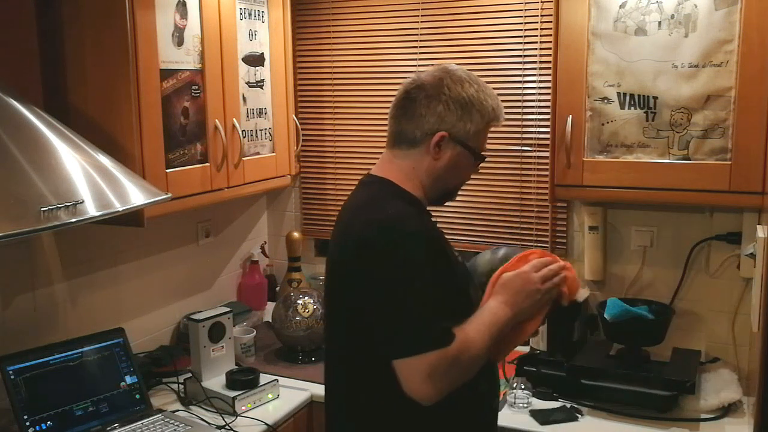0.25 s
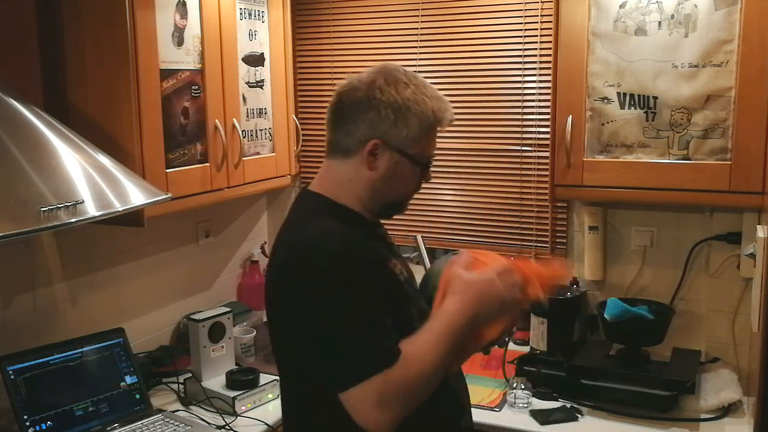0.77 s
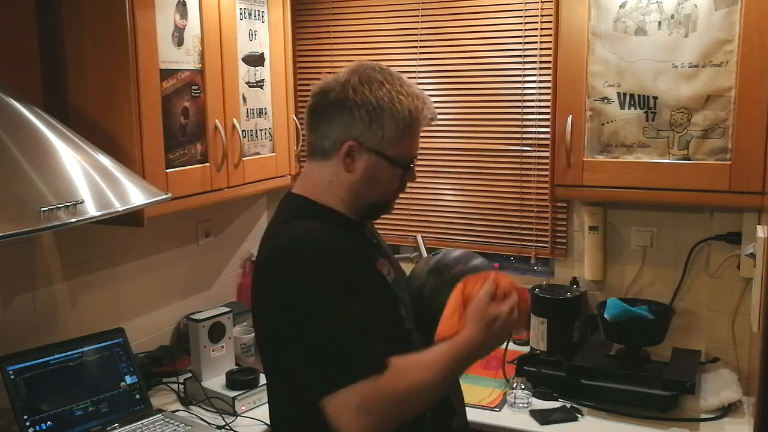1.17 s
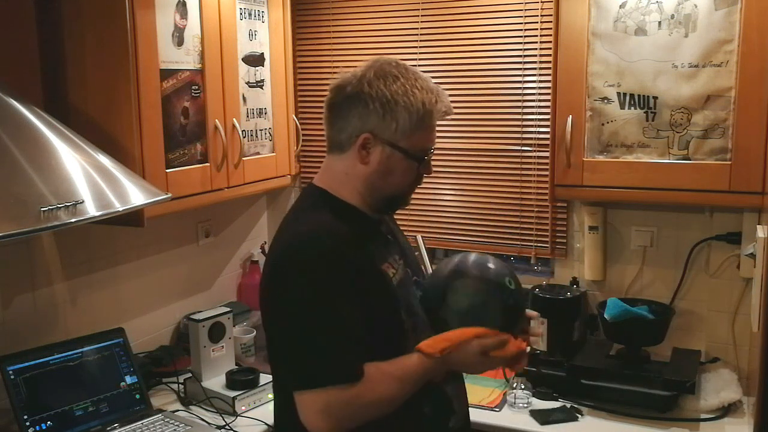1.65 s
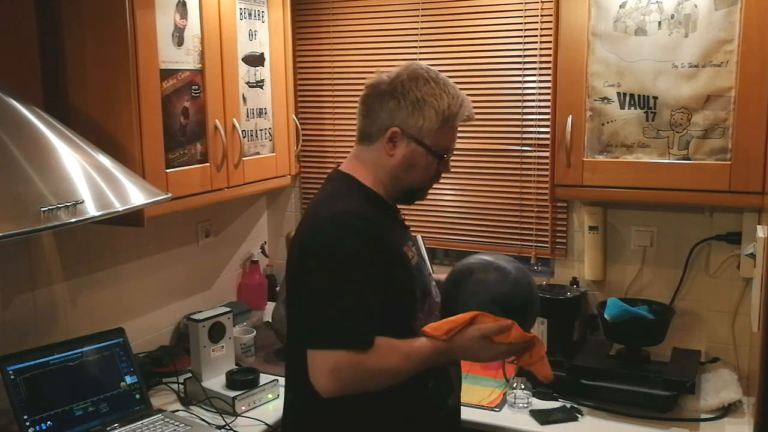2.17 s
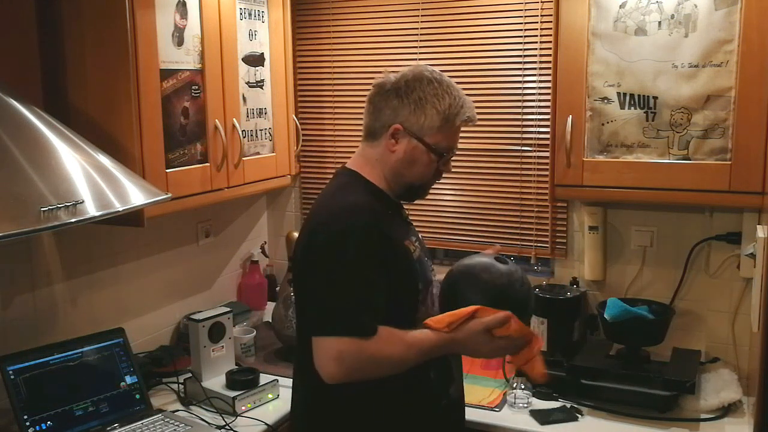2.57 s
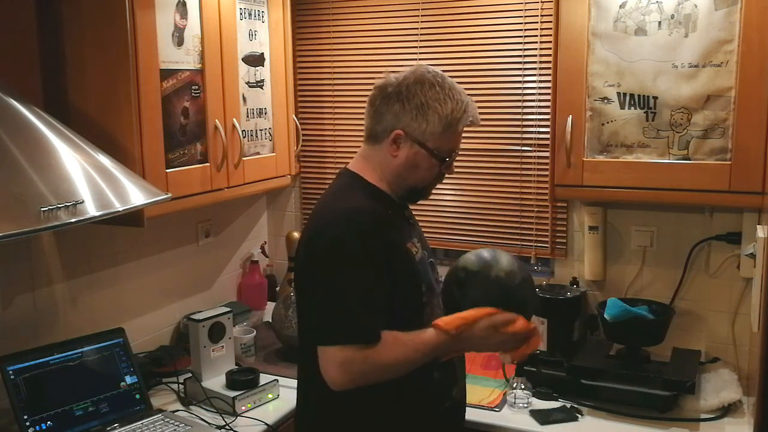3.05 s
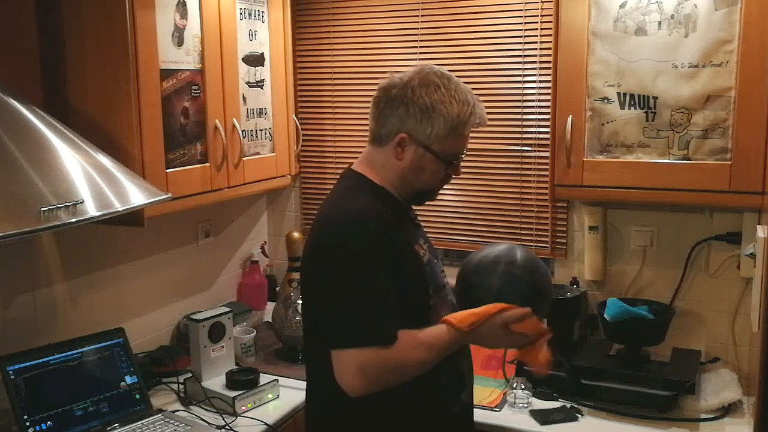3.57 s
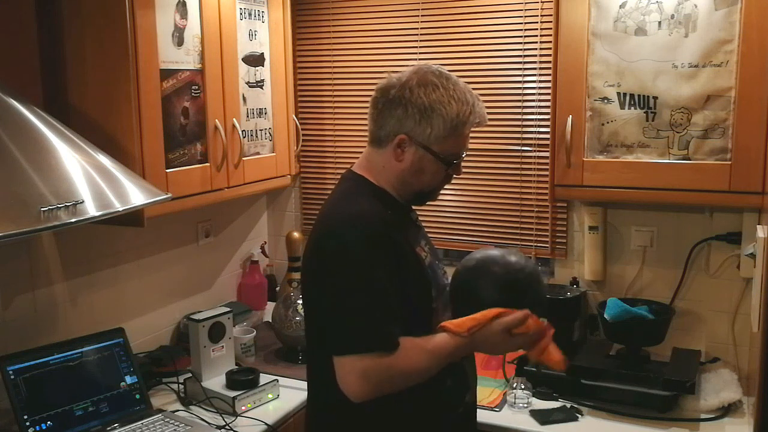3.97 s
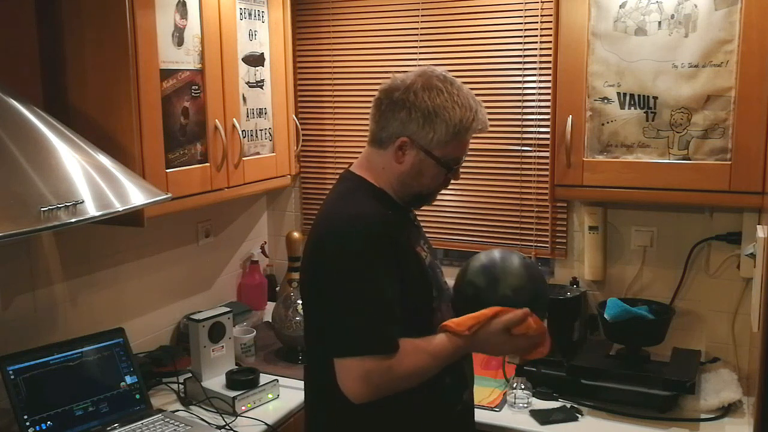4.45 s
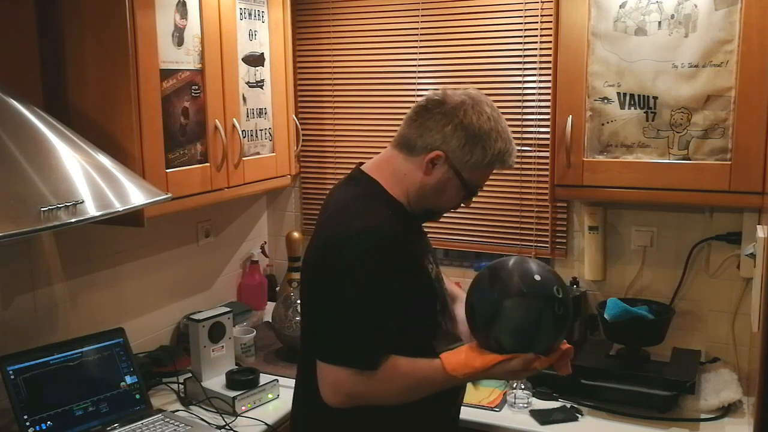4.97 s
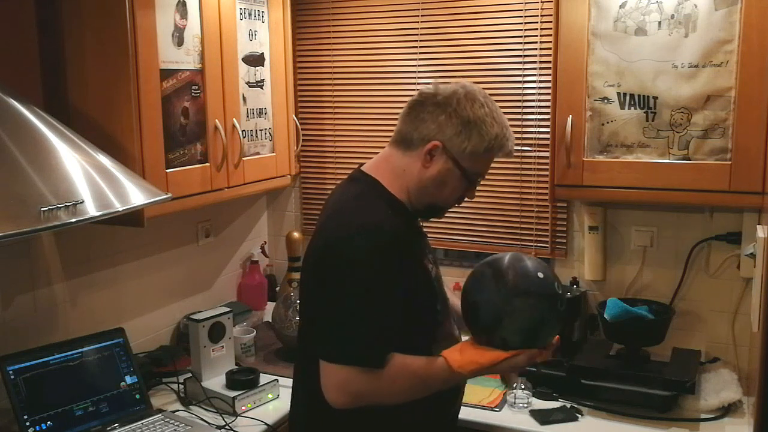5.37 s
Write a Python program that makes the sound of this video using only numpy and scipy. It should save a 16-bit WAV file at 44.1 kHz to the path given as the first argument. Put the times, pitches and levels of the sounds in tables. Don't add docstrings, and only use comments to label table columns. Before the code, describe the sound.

Soft cloth strokes hiss over a hard heavy ball, with small clicks and dull thuds, then two juddering knocks near the end.

```python
import sys
import numpy as np
from scipy import signal
from scipy.fft import rfft, irfft
from scipy.io import wavfile
from scipy.ndimage import uniform_filter1d

SR = 44100
rng = np.random.default_rng(int(sys.argv[2]) if len(sys.argv) > 2 else 0)


def boost_factor(decibels):
    exponent = np.asarray(decibels, float) / 20
    return 10 ** exponent


def put_to_file(sound):
    columns = np.atleast_2d(sound).T
    safe = np.clip(columns, -1, 1)
    whole_steps = np.round(safe * 32767)
    wavfile.write(sys.argv[1], SR, whole_steps.astype(np.int16))


N = 246827
STEP = 32

# heaviest moment in seconds, building in seconds,
# easing in seconds, rumble in dB, scrub in dB.
CATCHES = [
    (5.05, 0.088, 0.14, -41.5, -53),
    (5.37, 0.068, 0.09, -47, -53),
]


def evened(x):
    return x / np.sqrt(np.mean(x ** 2) + 1e-20)


def read(points, hz):
    f, value = np.transpose(points)
    return np.interp(np.log(hz + 1), np.log(f + 1), value)


def add(mix, s, sound):
    part = mix[round(s * SR):][:len(sound)]
    part += sound[:len(part)]


def arch(s, rise, fall):
    t = np.arange(0, N, STEP) / SR - s
    progress = np.where(t < 0, -t / rise, t / fall)
    return np.cos(np.pi / 2 * np.clip(progress, 0, 1)).clip(0)


def course(points):
    return np.interp(np.arange(0, N, STEP) / SR, *np.transpose(points))


def fine(x):
    return np.interp(np.arange(N), np.arange(0, N, STEP), x)


def noise(spectrum, size, patchy_db=0.):
    hz = np.fft.rfftfreq(size, 1 / SR)
    a, b, patches = rng.standard_normal((4 * N // size + 5, len(hz), 3)).T
    patches = uniform_filter1d(patches, size=7, axis=0)
    patches = evened(uniform_filter1d(patches, size=19, axis=1))
    z = (a + 1j * b) * boost_factor(read(spectrum, hz)[:, None] + patchy_db * patches)
    return evened(signal.istft(z, nperseg=size, noverlap=3 * size // 4)[1][:N])


def whistle(hz, width, steady=0.):
    r = np.exp(-np.pi * width / SR)
    slow = rng.standard_normal((len(hz) + 2000, 2)) @ [1, 1j]
    for _ in range(2):
        slow = signal.lfilter([1 - r], [1, -r], slow)
    slow = steady + slow[2000:] / abs(slow).mean()
    waver = evened(uniform_filter1d(rng.standard_normal(len(hz)), size=500))
    phase = 2 * np.pi * np.cumsum(hz * (1 + .003 * waver)) / SR
    return evened((slow * np.exp(1j * phase)).real)


def cloth():
    # frequency in Hz, level in dB per Hz.
    hiss_spectrum = [(880, -18.5), (1900, -13), (2490, -7.5), (3410, -1), (3840, -1), (4900, -2.5),
                     (6400, -1.5), (7980, -6), (9310, -11.5), (13000, -24)]
    fizz_spectrum = [(5000, -44), (8000, 1.5), (10000, 2), (12500, -1.5), (15000, -9), (16500, -13)]
    slip_spectrum = [(900, -24), (2000, -19), (3000, -8.5), (4000, -1.5), (5000, -0.5), (6500, -4),
                     (9000, -8), (13000, -21.5)]
    scrub_spectrum = [(88, -25), (150, -4.5), (264, 2.5), (318, -5), (384, -1), (785, -3), (1260, -9),
                      (1690, -11.5), (3000, -16), (3900, -34), (6600, -120)]
    # fastest moment in seconds, speeding up in seconds,
    # slowing down in seconds, hiss in dB, fizz in dB relative to the hiss.
    wipes = [(.3, 0.16, 0.083, -52, -10), (.49, 0.12, 0.039, -54, -12), (.57, 0.053, 0.18, -49, -17),
             (.91, 0.11, 0.11, -47, -9.5), (1.05, 0.15, 0.12, -46.5, -8.5), (1.4, .07, .06, -64, 0),
             (1.53, .14, 0.081, -49.5, -11.5), (1.88, 0.18, 0.19, -51, -7), (2.18, 0.15, 0.055, -50.5, -8),
             (2.25, 0.056, 0.086, -55.5, -8), (2.38, 0.086, 0.05, -59, -9), (2.47, 0.061, 0.11, -53.5, -11),
             (2.57, 0.12, 0.31, -56, -7.5), (2.88, 0.22, 0.11, -52, -5), (3.16, .11, 0.16, -52.5, -9),
             (3.28, 0.09, 0.08, -57.5, -8), (3.37, .09, .035, -57, -11), (3.45, 0.036, .06, -57, -9),
             (3.57, 0.15, 0.093, -52, -9.5), (3.79, 0.086, 0.043, -56.5, -10),
             (3.84, 0.035, .17, -50.5, -9.5), (4.21, .11, 0.22, -52.5, -8), (4.46, 0.076, 0.23, -54, -13),
             (4.62, 0.066, .1, -54.5, -4.5), (4.76, 0.14, 0.12, -58.5, -3),
             (5.14, 0.019, 0.081, -59.5, -12), (5.43, 0.064, 0.11, -57, -0.5)]
    slides = [
        (1.694, 0.017, 0.019, -55, -8),
        (4.084, 0.017, 0.015, -55.5, -9),
        (5.09, 0.12, 0.036, -40.5, -7),
        (5.365, 0.05, .047, -43, -5.5),
    ]
    # middle in seconds, half length in seconds, hiss in dB.
    slack_drags = [(0.04, 0.12, -59), (0.396, .04, -60), (0.789, 0.072, -52.5), (1.16, 0.079, -53.5),
                   (1.3, 0.14, -58), (1.63, .07, -63), (2.027, 0.067, -62), (2.984, .04, -67),
                   (3.702, 0.079, -62.5), (4.002, 0.062, -58), (5.52, .06, -63), (5.6, 0.081, -58.5)]
    # time in seconds, scrub in dB.
    press = [(0, -57.5), (.38, -58.5), (.56, -56), (1.2, -55.5), (1.38, -62.5), (1.46, -55.5), (1.65, -62),
             (2.0, -57), (2.2, -60.5), (2.45, -59), (3.03, -62), (3.5, -60), (3.83, -54), (4.05, -61),
             (4.44, -56), (4.77, -56.5), (5.27, -62.5), (5.6, -58.5)]
    wipe_round, slide_round, fizz_steep = 0.89, 0.33, 1.67

    hiss, fizz, skid = boost_factor(2 * -76), 0, 0
    drags = [(s, half, half, db, -12) for s, half, db in slack_drags]
    for s, rise, fall, db, fizz_db in [*wipes, *drags]:
        speed = arch(s, rise, fall) ** (2 * wipe_round)
        hiss = hiss + boost_factor(2 * db) * speed
        fizz = fizz + boost_factor(2 * (db + fizz_db)) * speed ** fizz_steep
    for s, rise, fall, db, fizz_db in slides:
        speed = arch(s, rise, fall) ** (2 * slide_round)
        skid = skid + boost_factor(2 * db) * speed
        fizz = fizz + boost_factor(2 * (db + fizz_db)) * speed ** fizz_steep
    scrub = boost_factor(2 * course(press))
    for s, rise, fall, _, db in CATCHES:
        scrub = scrub + boost_factor(2 * db) * arch(s, rise, fall)

    fibres = fine(hiss ** .5) * noise(hiss_spectrum, size=512, patchy_db=1.5)
    fibres = fibres + fine(fizz ** .5) * noise(fizz_spectrum, size=512, patchy_db=1.5)
    fibres = fibres + fine(skid ** .5) * noise(slip_spectrum, size=512, patchy_db=2.2)
    palm = fine(scrub ** .5) * noise(scrub_spectrum, size=1024, patchy_db=2.5)
    flicker = boost_factor(0.84 * evened(uniform_filter1d(rng.standard_normal(N), size=300)))
    return flicker * (fibres + palm)


def weave():
    # start in seconds, end in seconds, pitch at full pace in Hz,
    # power of the pace that the pitch follows, level in dB.
    threads = [(1.99, 2.07, 9050, 1, -66.5), (2.3, 2.415, 9780, 1, -69), (2.31, 2.385, 12360, .3, -75),
               (2.31, 2.36, 7850, 1, -73), (2.31, 2.4, 5950, .3, -72), (4.29, 4.5, 10530, 1, -66.5),
               (4.4, 4.46, 11000, 1, -71), (4.32, 4.49, 13150, .85, -75), (4.37, 4.43, 9300, .87, -69),
               (4.69, 4.77, 8780, .8, -68), (4.755, 4.812, 8780, .8, -61), (4.71, 4.84, 11150, .9, -70),
               (4.66, 4.83, 11850, 1, -67), (4.72, 4.82, 12440, 1.2, -67.5), (4.71, 4.94, 15050, .88, -77),
               (4.7, 4.74, 10300, .7, -66), (4.815, 4.925, 11000, .7, -64.5), (4.815, 4.9, 10470, .85, -65),
               (4.84, 4.9, 9780, 0, -73), (4.84, 4.915, 8960, 1, -68.5), (4.8, 4.91, 5630, .8, -66.5),
               (4.93, 4.964, 8600, .5, -72)]
    # time in seconds, pace relative to the fastest.
    hand_pace = [
        [(1.99, .99), (2.018, 1), (2.07, .9)],
        [(2.3, .97), (2.356, 1), (2.384, .966), (2.41, .8)],
        [(4.29, .784), (4.35, .83), (4.385, .87), (4.42, .965), (4.445, 1), (4.475, .885), (4.5, .84)],
        [(4.66, .72), (4.69, .88), (4.734, .98), (4.76, 1), (4.812, .8), (4.88, .725), (4.9, .69), (4.92, .595),
         (4.96, .44)],
    ]
    # start in seconds, end in seconds, pitch in Hz,
    # width in Hz, level in dB, share of the time spent swelling.
    hollows = [(0.023, .42, 701, 96, -66, 0.35), (0.391, 0.606, 680, 120, -55.5, 0.37),
               (0.599, 0.808, 717, 100, -54.5, 0.57), (0.154, 0.704, 2633, 350, -65, 0.96),
               (2.432, 2.515, 1405, 80, -63, .03), (2.86, 2.957, 1600, 20, -65.5, .3),
               (3.128, 3.25, 927, 27, -62, .1), (3.477, 3.715, 2810, 69, -59, .03),
               (3.491, 3.705, 800, 200, -55.5, 0.44), (4.497, 4.85, 648, 250, -68, 0.8),
               (.28, .34, 3100, 40, -67, .4), (.54, .68, 2520, 60, -69, .3), (1.2, 1.32, 950, 270, -65, .8),
               (1.5, 1.59, 6320, 1200, -61, .7), (2.099, 2.215, 6000, 1200, -57, 0.89),
               (3.15, 3.24, 3900, 700, -56, .6), (3.279, 3.4, 3400, 550, -61, 0.98),
               (3.532, 3.67, 1000, 90, -65, .3), (3.845, 3.9, 3470, 900, -54, .7),
               (4.45, 4.6, 4010, 900, -61, 0.8), (5.325, 5.405, 4750, 400, -52, .5),
               (5.38, 5.415, 3500, 600, -55, .7)]
    out = np.zeros(N)
    pace = uniform_filter1d(fine(course(np.vstack(hand_pace))), size=500)
    for start, end, hz, follows, db in threads:
        glide = hz * pace[round(start * SR):round(end * SR)] ** follows
        tone = whistle(glide, width=100, steady=1.6)
        add(out, start, boost_factor(db - 1.2) * tone * signal.windows.tukey(len(tone), .45))
    for start, end, hz, width, db, swell in hollows:
        count = round((end - start) * SR)
        peak = np.clip(swell, .01, .99)
        shape = np.sqrt(np.interp(np.arange(count) / count, [0, peak, 1], [0, 1, 0]))
        tone = whistle(np.full(count, hz), width, steady=60 / width)
        add(out, start, boost_factor(db) * tone * shape)
    return out


def handling():
    # frequency in Hz, level in dB per Hz.
    rumble_spectrum = [(12, -49), (20, -58), (39, 2.5), (60, 13.5), (72, 0), (140, -2), (226, -6.5),
                       (263, -17), (320, -12.5), (420, -56), (700, -120)]
    # time in seconds, level in dB.
    load = [(0, -64), (1.06, -62.5), (1.78, -62.5), (1.89, -56), (2.16, -64), (2.55, -59), (2.9, -64),
            (3.32, -57.5), (4.44, -63), (4.59, -64), (4.81, -67), (5.25, -63), (5.6, -74)]
    # start in seconds, peak in dB, pitch in Hz, rise in seconds.
    thuds = [(.125, -51.5, 50, 0.019), (1.481, -46.5, 135, 0.0071), (0.878, -44, 69, 0.0092),
             (1.101, -52, 97, 0.013), (1.454, -42.5, 65.6, 0.01), (1.734, -49, 60, 0.012),
             (1.882, -37.5, 69, 0.011), (2.421, -37.5, 87, 0.0076), (2.523, -43.5, 89, 0.0076),
             (2.747, -37.5, 59, 0.014), (2.851, -32.5, 80, 0.0029), (3.119, -37, 69, 0.0064),
             (3.553, -48, 60, 0.0089), (3.82, -37.5, 64.6, 0.013), (3.8225, -36.5, 131, 0.0058),
             (4.127, -36, 63.5, 0.0061), (4.21, -40.5, 89, 0.0084), (4.487, -41, 69.6, 0.0062),
             (4.974, -17, 108, 0.0075), (4.9836, -13, 152, 0.0068), (4.984, -27.5, 327, 0.006),
             (5.067, -35, 424, 0.0023), (5.392, -43.5, 188, 0.0087), (5.006, -15.5, 110, 0.0035),
             (5.018, -32, 62, .008), (4.985, -17.5, 58, 0.0079), (5.3122, -25.5, 95, 0.011),
             (5.391, -41.5, 107, 0.0071), (5.124, -41, 60, 0.011), (5.045, -38, 150, .005),
             (5.08, -39, 160, 0.0063), (5.118, -41, 382, .003), (5.129, -37, 110, 0.0086),
             (5.42, -41.5, 85, 0.0047), (.27, -51, 110, .008), (.444, -51, 97, .007),
             (2.002, -49, 94, .007), (3.478, -47, 62, .008), (3.56, -46.5, 140, 0.0076),
             (3.727, -48, 113, .007), (4.503, -45, 201, 0.0029)]
    force = boost_factor(course(load))
    for s, rise, fall, db, _ in CATCHES:
        force = force + boost_factor(db) * arch(s, rise, fall) ** 1.6
    out = boost_factor(2.5) * fine(force) * noise(rumble_spectrum, size=4096)
    t = np.arange(8000) / SR
    for s, db, hz, rise in thuds:
        u = t / max(rise, 1e-3)
        add(out, s, boost_factor(db) * u * np.exp(1 - u) * np.sin(2 * np.pi * hz * t))
    return out


def knock(db, hz, t60, grit, edge_db, dull):
    t = np.arange(len(grit)) / SR
    edge = boost_factor(edge_db) * (1 - t * hz * 2.7) * np.exp(-t * hz * 2.0)
    ring = boost_factor(-3.5 - 60 * t / t60) * np.sin(2 * np.pi * hz * t)
    burst = boost_factor(-7.5 - 60 * t / t60) * evened(uniform_filter1d(grit, size=dull))
    contact = np.hanning(dull + 2)
    return boost_factor(db) * np.convolve(edge + ring + burst, contact / contact.sum())


def contacts():
    # start in seconds, peak in dB, pitch in Hz, t60 in seconds.
    taps = [(0.625, -44, 890, 0.039), (0.984, -54, 796, 0.037), (1.106, -42.5, 990, 0.036),
            (1.289, -47, 872, 0.014), (2.437, -33, 1370, 0.07), (2.746, -29, 804, 0.011),
            (2.751, -40.5, 2130, 0.025), (3.116, -40, 503, 0.034), (3.129, -34, 477, 0.012),
            (3.482, -33.5, 520, 0.014), (3.496, -36, 800, 0.037), (3.4965, -36, 400, .018),
            (3.529, -40, 700, 0.022), (2.77, -44, 850, .03), (3.574, -39, 780, 0.038),
            (3.831, -32, 500, 0.022), (3.837, -33.5, 750, 0.039), (.868, -40.5, 620, .03),
            (.982, -40.5, 1200, 0.026), (3.27, -48, 1500, 0.011), (4.305, -48, 1000, 0.022),
            (5.003, -31, 1964, 0.041), (5.011, -31, 2030, 0.018), (4.987, -31.5, 1320, .016),
            (4.988, -33, 2050, .014), (4.978, -36, 1700, .015)]
    judder = [(4.9728, -35, 1250, 0.019), (4.9812, -25, 1050, 0.008), (4.985, -19.5, 700, 0.0062),
              (4.988, -21, 780, 0.011), (4.9995, -20, 650, 0.007), (5.004, -27, 960, 0.012),
              (5.01, -28, 650, 0.005), (5.0155, -29.5, 685, 0.0046), (5.069, -30, 560, 0.014),
              (5.119, -35, 950, 0.011), (5.291, -55, 1140, 0.014), (5.315, -43, 1060, 0.014),
              (5.325, -29, 910, 0.012), (5.333, -35, 860, 0.006), (5.334, -39, 1890, .012),
              (5.388, -37.5, 662, 0.012)]
    ticks = [(0.0687, -42, 3260, 0.017), (.069, -49, 2300, .015), (3.2, -47, 3000, .015),
             (0.111, -53, 2560, 0.014), (0.13, -50, 3200, 0.013), (0.4776, -43, 2900, 0.014),
             (3.5, -38, 3580, 0.013), (3.8216, -30, 3800, 0.011), (5.2629, -62, 4910, 0.012),
             (5.293, -52, 4930, 0.012), (3.8372, -33, 3000, 0.016), (3.8365, -36, 5300, .012),
             (3.832, -30, 3530, 0.023)]
    cracks = [(2.4356, -29, 4950, 0.012), (2.7462, -35, 2800, 0.007), (3.1258, -34.5, 3640, 0.018),
              (3.8297, -26, 3760, 0.013), (4.373, -40.5, 4400, 0.015), (5.1194, -38, 3330, 0.011),
              (5.3253, -33, 4200, 0.006), (2.4232, -41, 13500, .004), (2.4365, -38, 10100, .008),
              (2.4362, -31.5, 5500, 0.0078), (3.1268, -34, 6000, 0.013), (3.8305, -34, 5400, 0.019),
              (2.436, -33.5, 3700, 0.008)]
    # table, sign, edge in dB, contact width in samples, delay of the peak in seconds
    kinds = [(taps, 1, -1.5, 11, .0012),
             (judder, -1, -1.5, 13, .0008),
             (ticks, 1, -13.0, 5, 0),
             (cracks, 1, -3.0, 2, .0007)]
    out = np.zeros(N)
    for table, sign, edge_db, dull, late in kinds:
        for s, db, hz, t60 in table:
            grit = rng.standard_normal(6000)
            add(out, s + late, sign * knock(db, hz, t60, grit, edge_db, dull))
    return out


def kitchen(x):
    room_t60, room_db = 0.14, -8.5
    t = np.arange(SR // 2) / SR
    tail = rng.standard_normal(len(t)) * boost_factor(-60 * t / room_t60) * (t > .004)
    return x + boost_factor(room_db) * signal.fftconvolve(x, tail / np.linalg.norm(tail))[:N]


def room_floor():
    # frequency in Hz, level in dB per Hz.
    floor_spectrum = [(18, -42), (30, 0.5), (134, 2.5), (199, -23), (287, -5), (684, -14), (1500, -13),
                      (2200, -17), (3300, -21), (5000, -19.5), (16000, -32.5)]
    return boost_factor(-63.5) * noise(floor_spectrum, size=2048)


def scene():
    mono = cloth() + weave() + handling() + kitchen(contacts()) + room_floor()
    mono = signal.sosfilt(signal.butter(2, 38, "high", fs=SR, output="sos"), mono)
    treble_cut = signal.firwin(255, 15850, window=("kaiser", 5), fs=SR)
    mono = signal.oaconvolve(mono, treble_cut, "same")
    return np.array([mono, mono])


def roll_off(x):
    return signal.sosfilt(signal.butter(12, 16490, fs=SR, output="sos"), x)


def record(dry):
    # middle in seconds, low edge in Hz, high edge in Hz, level in dB.
    fills = [(0.267, 7410.0, 9130.0, -68), (0.569, 6720.0, 8440.0, -63), (0.58, 4130, 5860.0, -60),
             (0.594, 8790.0, 10420.0, -71.0), (1.07, 7410.0, 9820.0, -60), (1.08, 5510.0, 7060.0, -61),
             (2.682, 4480.0, 5770.0, -67), (2.683, 8870.0, 11110.0, -72), (2.775, 11630.0, 13870.0, -74.1),
             (3.309, 5130, 6370.0, -70.5), (3.309, 7490.0, 9040.0, -74), (4.632, 4540, 6460.0, -67),
             (4.632, 8180.0, 9730.0, -71.4)]
    side, size = np.zeros(N), 2048
    hz = np.fft.rfftfreq(size, 1 / SR)
    swell = np.sin(np.pi * np.arange(size) / size)
    for s, low_hz, high_hz, db in fills:
        inside = (hz > low_hz) & (hz < high_hz)
        band = irfft(rfft(rng.standard_normal(size)) * inside)
        add(side, s - size / SR / 2, boost_factor(db + 3.0) * evened(band) * swell)
    return roll_off(dry + side * [[1], [-1]])


dry = scene()
out = record(dry)
put_to_file(out)
```